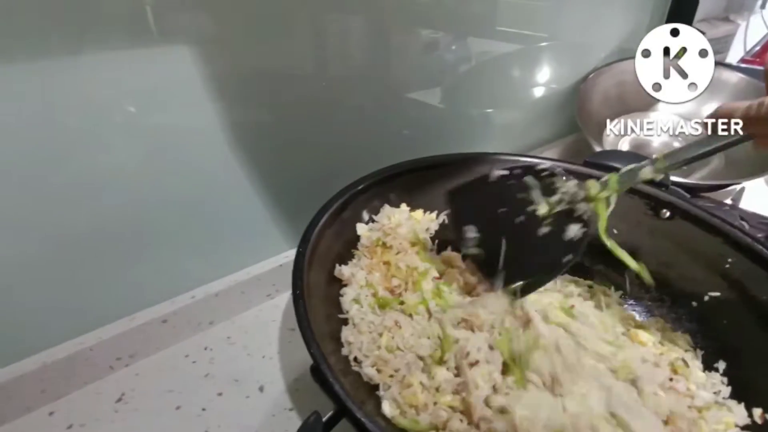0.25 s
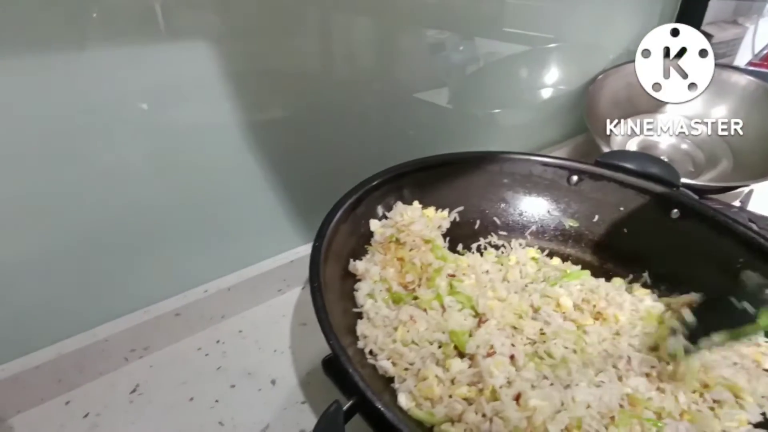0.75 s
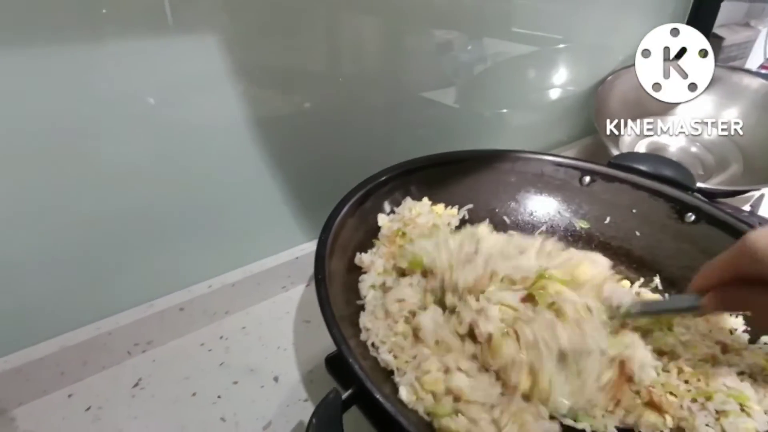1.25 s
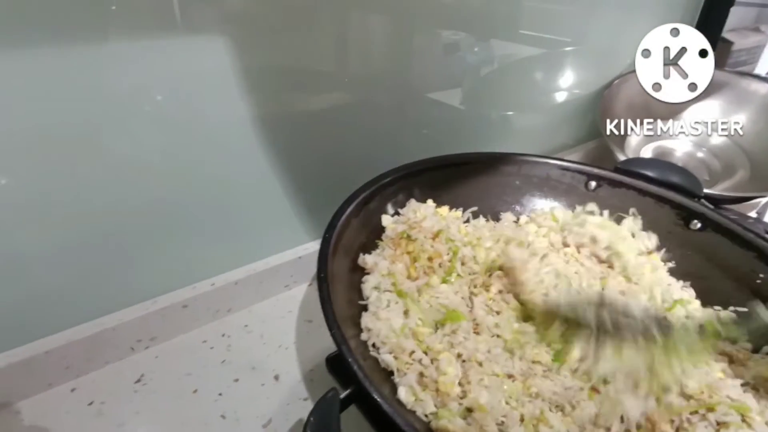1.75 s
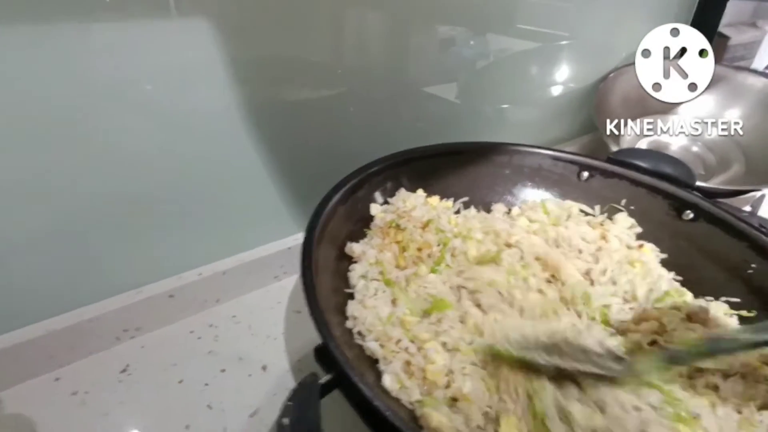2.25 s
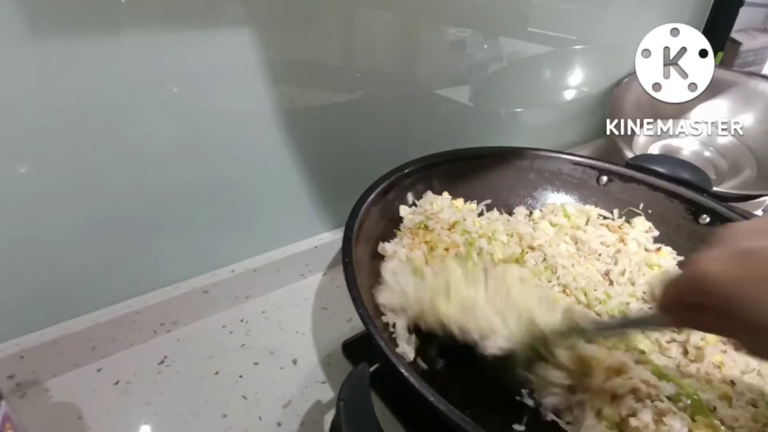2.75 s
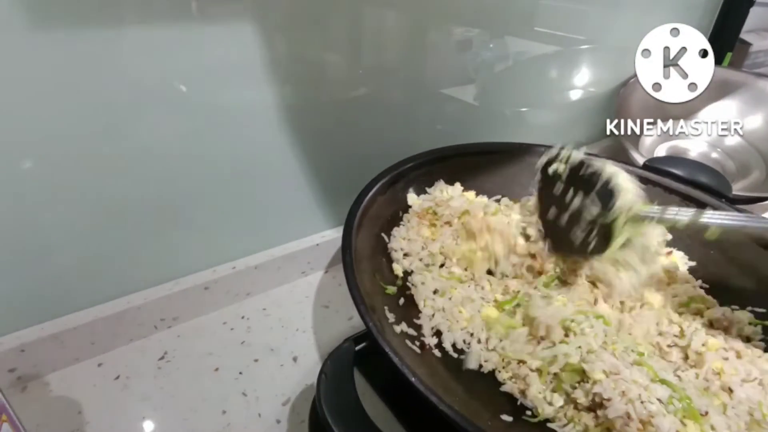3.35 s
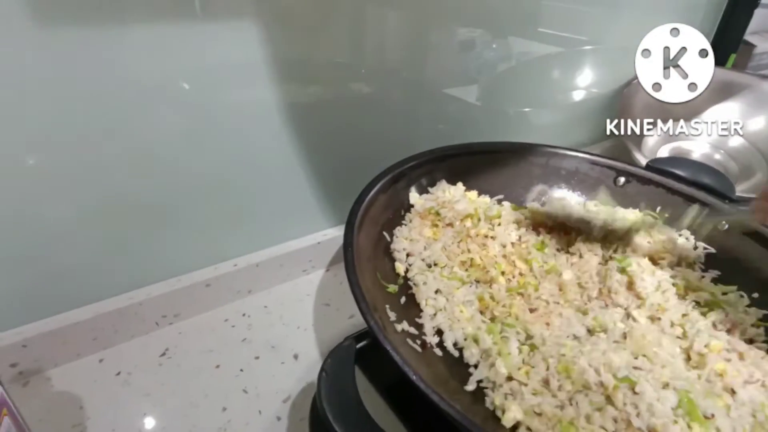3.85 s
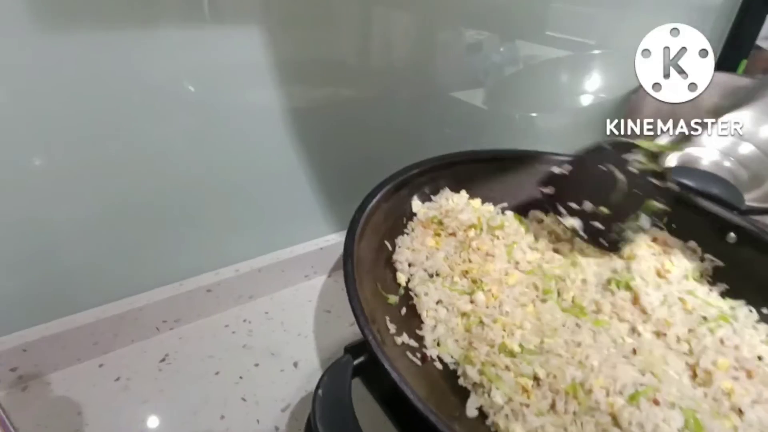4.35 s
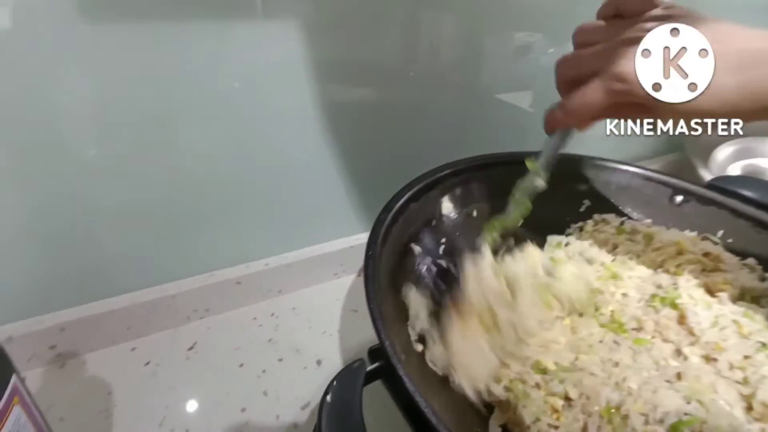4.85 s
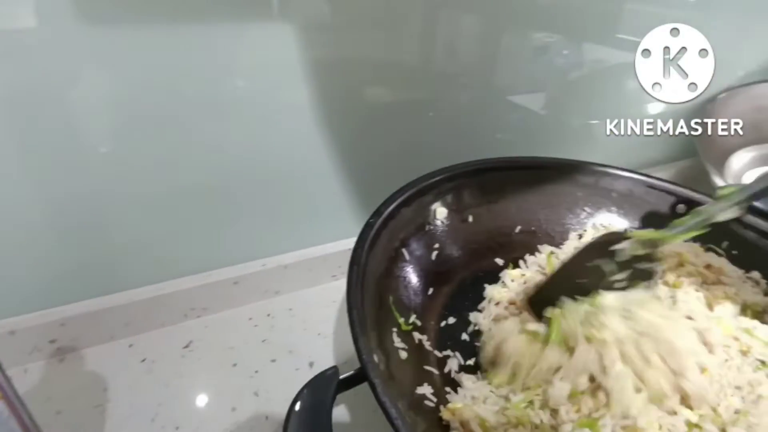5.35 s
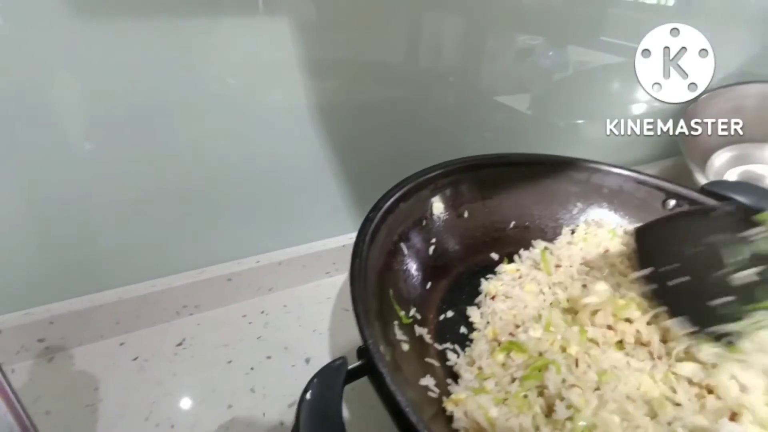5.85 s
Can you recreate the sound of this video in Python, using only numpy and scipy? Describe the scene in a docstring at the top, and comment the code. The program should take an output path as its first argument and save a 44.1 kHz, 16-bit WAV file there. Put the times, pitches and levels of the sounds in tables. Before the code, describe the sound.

In a small hard-walled kitchen, a spatula stirs rice in a wok. Soft swishes of rice lead to a cluster of dull knocks, bumps and a short scrape near one second. A sharp bright clank and rasping scrapes come at two and a half seconds, then quieter rustling, light taps and a final knock. A burner rushes softly beneath. Close, slightly dull mono pickup.

```python
"""Stir-frying rice in a wok

Struck modes: a metal spatula knocks and clanks on the pan, and the wok bumps on its support.
Stick-slip friction: the blade scrapes along the pan, as filtered clicks, and at moments squeaks, as gliding tones.
Granular noise: the rice rustles and sizzles softly. All of this echoes in a small, hard-walled kitchen.
Beneath it go on the shaped noise of a gas burner and the wavering sines of a faint motor hum."""
import sys
import numpy as np
from scipy import signal
from scipy.fft import rfft, irfft, next_fast_len
from scipy.io import wavfile

SR = 44100
rng = np.random.default_rng(int(sys.argv[2]) if len(sys.argv) > 2 else 0)


def unload_audio(sound):
    """Save the sound as a 16-bit wav file, at the path given as the first command line argument."""
    columns = np.transpose(np.atleast_2d(sound))
    # keep every value between -1 and 1, then stretch to whole-number steps
    steps = np.round(np.clip(columns, -1, 1) * 32767)
    wavfile.write(sys.argv[1], SR, steps.astype(np.int16))


N = 268107
TIME = np.arange(N) / SR
RING_TIME = TIME[:SR // 4]


def from_db(db):
    """Logarithmic level: decibels to amplitude gain."""
    return 10 ** (np.asarray(db) / 20)


def rms_one(x):
    """Power normalisation: scale to rms 1."""
    return x / np.sqrt(np.mean(x ** 2) + 1e-20)


def energy_one(x):
    """Energy normalisation: scale the sum of squares to 1."""
    return x / np.sqrt(np.sum(x ** 2) + 1e-20)


def at_hz(points, hz):
    """Logarithmic frequency scale: interpolate a table between its frequencies."""
    known_hz, values = np.transpose(points)
    return np.interp(np.log(np.maximum(hz, 1)), np.log(known_hz), values)


def colour(x, spectrum):
    """Spectral shaping: weight each frequency of a signal by a table; rms 1."""
    size = next_fast_len(len(x))
    gain = from_db(at_hz(spectrum, np.fft.rfftfreq(size, 1 / SR)))
    return rms_one(irfft(rfft(x, size) * gain, size)[:len(x)])


def drift(rate):
    """Slow random modulation: straight lines between `rate` random knots a second; rms 1."""
    knots = np.arange(0, TIME[-1] + 1, 1 / rate)
    return rms_one(np.interp(TIME, knots, rng.standard_normal(len(knots))))


def dying(t, t60):
    """Exponential damping: from 1 down by 60 dB in t60 seconds."""
    return np.exp(-np.log(1000) * t / max(t60, 1e-4))


def through(x, response):
    """Linear superposition: convolve a signal with an impulse response."""
    return signal.fftconvolve(x, response)[:len(x)]


def above(x, hz):
    """Radiation efficiency: a small body radiates little below its corner."""
    return signal.sosfilt(signal.butter(2, hz, "high", fs=SR, output="sos"), x)


def ringing(modes, vary_db):
    """Modal excitation: one striking spot gives each mode its own strength and sign; energy 1."""
    ring = 0
    for hz, db, t60 in modes:
        mode = energy_one(np.sin(2 * np.pi * hz * RING_TIME) * dying(RING_TIME, t60))
        strength = from_db(db + vary_db * rng.standard_normal())
        ring = ring + strength * rng.choice([-1, 1]) * mode
    return energy_one(ring)


def push(hz, width_hz):
    """Cushioned contact: an oscillation that swells and dies, faster for a larger width; energy 1."""
    age = np.pi * width_hz * RING_TIME
    return energy_one(age * np.exp(-np.minimum(age, 200)) * np.sin(2 * np.pi * hz * RING_TIME))


def grains(per_s, spread_db):
    """Shot noise: tiny random impulses of uneven size; rms 1."""
    sizes = from_db(spread_db * np.minimum(rng.exponential(1, N), 4)) * rng.choice([-1, 1], N)
    return rms_one(sizes * (rng.random(N) < per_s / SR))


def add(out, s, db, sound):
    """Level of a transient: mix in a sound of energy 1 at time s, db being its rms over 8 ms."""
    start = int(s * SR)
    gain = from_db(db) * np.sqrt(.008 * SR)
    part = out[start:start + len(sound)]
    part += gain * sound[:len(part)]


# Vibration modes of the bowl, damped by the rice: pitch_hz, mean relative level_db, t60_s
BOWL_MODES = [(221, -5.5, 0.52), (305.5, -4.5, 0.75), (379.4, 3, 0.48), (587.4, 5, 0.076), (667, -6, .1),
              (811, -2.5, 0.11), (890, -4.5, 0.4), (927, -9, 0.093), (988, 5, 0.11), (1037, 0.5, 0.21),
              (1080, -6, 0.094), (1253, -9, 0.097), (1380, -18.5, 0.06), (1743, -4.5, 0.14),
              (1975, -12, 0.13)]


def bowl(hz, width_hz, bowl_db=-5, bowl_low_hz=170):
    """Impact response: one contact and the modal ring that it leaves in the bowl; energy 1."""
    contact = energy_one(above(push(hz, width_hz), bowl_low_hz))
    ring = energy_one(through(contact, ringing(BOWL_MODES, vary_db=4.5)))
    return energy_one(contact + from_db(bowl_db) * ring)


# Bright ring of blade against pan: pitch_hz, mean relative level_db, t60_s
BLADE_RING_MODES = [(1380, 6.5, 0.011), (1632, 0.5, 0.015), (1940, -7.5, 0.066), (2194, -10.5, .035),
                    (2648, -5, 0.022), (2733, 1.5, 0.016), (2960, -14.5, 0.0082), (3320, -22.5, 0.044),
                    (3456, -0.5, 0.014), (3614, -11.5, 0.013), (3710, 2, 0.011), (4000, -16.5, .012),
                    (4880, -4.5, 0.021), (4545, 7.5, 0.014), (4720, -10.5, 0.012), (6090, -0.5, 0.0086),
                    (7040, -0.5, 0.012)]
# Noise spectrum of the edge cracking on metal: frequency_hz, relative level_db per Hz
CRACK_SPECTRUM = [(900, -23.5), (1600, 2.5), (2400, 3), (3500, 2.5), (4900, 7), (5500, -8.5), (6400, -0.5),
                  (7200, -40), (8200, -11.5)]


def clink(ring_db=-4, crack_db=-1, crack_t60=0.017):
    """Hard impact: a noisy crack of the edge and the bright modes of the blade; energy 1."""
    landing = 1 - np.exp(-RING_TIME / .0012)  # rice under the edge cushions the touch
    noise = colour(rng.standard_normal(len(RING_TIME)), CRACK_SPECTRUM)
    crack = energy_one(noise * dying(RING_TIME, crack_t60))
    ring = ringing(BLADE_RING_MODES, vary_db=6.5)
    return energy_one(landing * (from_db(crack_db) * crack + from_db(ring_db) * ring))


# The spatula lands through a layer of rice, a dull "tok": start_s, level_db of the first touch, pitch_hz
RICE_KNOCKS = [(0.852, -32, 695), (0.902, -37.5, 1107), (0.940, -33.5, 663), (1.001, -39.5, 626),
               (2.499, -31, 577), (4.554, -43, 597), (5.596, -49, 567), (6.072, -31.5, 600)]
KNOCK_WIDTH_HZ, REBOUND_S, REBOUND_LOSS_DB = 258, 0.0072, 6


def knocks(clink_db=-18):
    """Soft impact with rebound: a cushioned landing sounds the bowl, hardly the springy blade, twice."""
    out = np.zeros(N)
    for s, db, hz in RICE_KNOCKS:
        for touch in range(2):
            sound = bowl(hz, KNOCK_WIDTH_HZ) + from_db(clink_db) * clink()
            add(out, s + touch * REBOUND_S, db - touch * REBOUND_LOSS_DB, sound)
    return out


# The bare edge strikes bare metal: start_s, blade clink level_db, bowl level_db, both of the first touch
METAL_CLANKS = [(0.742, -70, -86), (0.926, -39.5, -40.5), (0.994, -48.5, -46.5), (1.136, -59, -47),
                (1.541, -61.5, -59.5), (2.485, -43, -48), (2.493, -24, -26), (4.289, -63, -64.5),
                (4.417, -44, -45), (4.436, -49.5, -61), (4.657, -53.5, -73), (4.777, -66.5, -67),
                (5.040, -70, -60.5), (5.212, -63.5, -62), (6.073, -56, -41.5)]
CLANK_HZ, CLANK_WIDTH_HZ, CHATTER_S, CHATTER_LOSS_DB = 1020, 450, 0.0023, 5


def clanks(pitch_spread=0.21):
    """Contact chatter: three quick touches, each weaker and on its own random spot."""
    out = np.zeros(N)
    for s, clink_db, bowl_db in METAL_CLANKS:
        for touch in range(3):
            at, loss_db = s + touch * CHATTER_S, touch * CHATTER_LOSS_DB
            add(out, at, clink_db - loss_db, clink())
            spot = rng.uniform(-1, 1)
            hz = CLANK_HZ * np.exp(pitch_spread * spot)
            add(out, at, bowl_db - loss_db, bowl(hz, CLANK_WIDTH_HZ))
    return out


# The wok bumps on its support: start_s, knock level_db, low thump level_db
SUPPORT_BUMPS = [(0.056, -61.5, -64), (0.622, -62.5, -65), (0.871, -51, -42), (0.906, -34, -40),
                 (0.928, -30.5, -40), (0.958, -32.5, -38), (0.997, -49, -44.5), (1.242, -65, -61),
                 (1.389, -51, -70), (2.497, -38, -42.5), (4.254, -51, -53), (4.438, -48, -54.5),
                 (5.754, -48, -53)]
BUMP_HZ, BUMP_WIDTH_HZ = 444, 1030


def bumps(thump_hz=98, thump_width_hz=42, thump_low_hz=52,
          settle_s=0.00896, settle_db=-5, settle_hz=290, settle_width_hz=260):
    """Collision of heavy bodies: a knock and a low thump, then a softer touch as the wok settles."""
    out = np.zeros(N)
    thump = energy_one(above(push(thump_hz, thump_width_hz), thump_low_hz))
    for s, knock_db, thump_db in SUPPORT_BUMPS:
        add(out, s, knock_db, bowl(BUMP_HZ, BUMP_WIDTH_HZ))
        add(out, s, thump_db, thump)
        settle_at = s + settle_s * rng.uniform(0.794, 1.167)
        add(out, settle_at, knock_db + settle_db, bowl(settle_hz, settle_width_hz, bowl_db=-7.5))
    return out


# The blade slides along the pan: start_s, length_s, bright rasp level_db and dull grind level_db
# (both before the pressure changes), pressure change_db over the stroke
SCRAPE_STROKES = [(0.857, 0.13, -50.5, -42.5, -1), (1.137, 0.044, -73, -45, -6.5),
                  (2.50, 0.11, -41.5, -38, -12), (2.623, 0.063, -43.5, -49, -6.5),
                  (2.736, 0.13, -69.5, -55, -6), (4.415, 0.12, -56.5, -53, -2),
                  (4.546, 0.14, -54, -55.5, 1.5), (6.051, 0.046, -50, -60, 6)]
# Spectrum of the bright rasp: frequency_hz, relative level_db per Hz
RASP_SPECTRUM = [(1200, -9), (1700, -15.5), (2200, -8), (2800, -5.5), (3300, 7.5), (3650, 1.5), (4050, 3.5),
                 (4450, 8.5), (4950, -3.5), (5400, -5.5), (6400, -10.5), (7500, -9.5), (8200, -19)]
# Spectrum of the dull grind: frequency_hz, relative level_db per Hz
GRIND_SPECTRUM = [(70, -21.5), (200, 2.5), (400, -2), (700, 2), (1100, -8), (1500, -8.5), (2000, -20),
                  (3000, -40)]
STROKE_ATTACK_S, STROKE_RELEASE_T60 = 0.006, 0.057
UNLOAD_DB_PER_S = 43.5  # the grind fades as the rice slides off the blade


def scrapes(slips_per_s=1500, judder_db=5.0, blade_db=-8, bowl_db=-5):
    """Stick-slip friction: dense clicks of uneven strength rasp on the blade and grind in the bowl."""
    judder = from_db(judder_db * np.tanh(drift(rate=120)))
    slips = grains(slips_per_s, spread_db=0.0) * judder
    blade_ring = rms_one(through(slips, ringing(BLADE_RING_MODES, vary_db=0.5)))
    bright = rms_one(colour(slips, RASP_SPECTRUM) + from_db(blade_db) * blade_ring)
    bowl_ring = rms_one(through(slips, ringing(BOWL_MODES, vary_db=2.5)))
    dull = rms_one(colour(slips, GRIND_SPECTRUM) + from_db(bowl_db) * bowl_ring)
    out = np.zeros(N)
    for start, length, rasp_db, grind_db, change_db in SCRAPE_STROKES:
        age = np.maximum(TIME - start, 0)
        release = dying(np.maximum(age - length, 0), STROKE_RELEASE_T60)
        contact = np.minimum(age / STROKE_ATTACK_S, 1) * release
        pressure = contact * from_db(change_db * np.minimum(age / length, 1))
        rasp = bright * from_db(rasp_db)
        grind = dull * from_db(grind_db - UNLOAD_DB_PER_S * age)
        out += pressure * (rasp + grind)
    return out


# The edge catches and sings briefly: start_s, end_s, mean start pitch_hz, mean end pitch_hz,
# level_db at the middle
EDGE_SQUEAKS = [(1.130, 1.185, 1910, 1906, -61.5), (2.682, 2.719, 770, 742, -55),
                (2.756, 2.805, 785, 702, -59), (2.823, 2.856, 670, 693, -57.5)]


def squeaks():
    """Periodic stick-slip: slips that fall into step are heard as a rough, gliding tone."""
    out = np.zeros(N)
    waver = 1 + .02 * drift(rate=300)
    flutter = rms_one(1 + .6 * drift(rate=250))
    for start, end, from_hz, to_hz, db in EDGE_SQUEAKS:
        along = np.clip((TIME - start) / (end - start), 0, 1)
        hz = (from_hz + (to_hz - from_hz) * along) * waver
        swell = 2 * np.sqrt(along * (1 - along))
        tone = np.sqrt(2) * np.sin(2 * np.pi * np.cumsum(hz) / SR)
        out += from_db(db) * swell * flutter * tone
    return out


# A spatula-load of rice is turned or falls back: peak_s, level_db added in power at the peak, rise spread_s
RICE_SWISHES = [(0.40, -61.5, 0.033), (1.29, -65.5, 0.068), (1.61, -64, 0.13), (2.10, -58.5, 0.035),
                (3.332, -60, 0.046), (3.83, -63, 0.075), (5.13, -68, 0.052), (5.58, -74, 0.05)]
# Spectrum of the rustle and sizzle: frequency_hz, relative level_db per Hz
RICE_SPECTRUM = [(200, -6.5), (600, -1.5), (1300, 5), (2000, -3), (3000, -4), (4000, -3.5), (4650, 0),
                 (5050, -3), (5450, -9), (6800, -7), (7700, -12.5), (8300, -30)]
SIZZLE_DB = -70
SWISH_FALL_RATIO = 1.14  # the rice settles more slowly than it is lifted


def rice(grains_per_s=2000, fizz_db=-5, clump_db=3.44):
    """Granular noise: moist grains part and fall in clumps, over the fine sizzle of the hot pan."""
    power = from_db(SIZZLE_DB) ** 2
    for s, db, spread_s in RICE_SWISHES:
        width_s = spread_s * np.where(TIME < s, 1, SWISH_FALL_RATIO)
        power = power + from_db(db) ** 2 * np.exp(-((TIME - s) / width_s) ** 2)
    falling = grains(grains_per_s, spread_db=4.5) * from_db(clump_db * drift(rate=79))
    crackle = falling + from_db(fizz_db) * rng.standard_normal(N)
    return np.sqrt(power) * colour(crackle, RICE_SPECTRUM)


# Decay of the kitchen's reverberation: frequency_hz, t60_s
KITCHEN_DECAY = [(100, 0.47), (500, 0.43), (1200, 0.6), (4000, 0.47), (8000, 0.53)]


def reflections(x, near_db=-4, near_t60=0.096, tail_db=-5, build_s=0.015):
    """Room acoustics: quick returns off splashback and worktop, then a diffuse decaying tail."""
    t = TIME[:SR]
    edges = np.geomspace(40, 12000, 9)
    tail = 0
    for low, high in zip(edges, edges[1:]):
        band_filter = signal.butter(2, [low, high], "band", fs=SR, output="sos")
        band = signal.sosfilt(band_filter, rng.standard_normal(len(t)))
        tail = tail + band * dying(t, at_hz(KITCHEN_DECAY, np.sqrt(low * high)))
    # the tail gets the share of white-noise energy below its top edge
    tail = energy_one(tail * (1 - np.exp(-t / build_s))) * np.sqrt(2 * edges[-1] / SR)
    near = energy_one(rng.standard_normal(len(t)) * dying(t, near_t60) * (t > .002))
    return through(x, from_db(near_db) * near + from_db(tail_db) * tail)


# Spectrum of the burner's rush: frequency_hz, relative level_db per Hz
BURNER_SPECTRUM = [(20, -13.5), (40, -15.5), (55, -7.5), (80, -11.5), (110, -8.5), (140, -10), (200, -12.5),
                   (260, -13), (400, -11), (650, -12), (1050, -14), (1500, -25), (2200, -29.5), (4000, -38)]
BURNER_DB = -63.5  # mean level
# Partials of the motor hum: mean pitch_hz, level_db (rms)
MOTOR_HUM = [(53.8, -79.5), (107.4, -70), (193.8, -76)]


def stove():
    """Broadband and tonal noise: the burner's soft rush and the unsteady partials of a fan motor."""
    level = from_db(BURNER_DB + .6 * drift(rate=25))
    rush = level * colour(rng.standard_normal(N), BURNER_SPECTRUM)
    hum = 0
    for hz, db in MOTOR_HUM:
        swell = 1 + .45 * drift(rate=9)
        wander = .55 * drift(rate=8)  # phase, radians
        hum = hum + from_db(db) * rms_one(swell * np.sin(2 * np.pi * hz * TIME + wander))
    return rush + hum


def scene():
    """Superposition: everything in the wok sounds through the kitchen, over the stove."""
    wok = knocks() + clanks() + bumps() + scrapes() + squeaks() + rice()
    # the point of contact travels round the pan, so its echo paths keep changing
    travel = 2 * np.pi * 4 * TIME
    room = reflections(wok * np.cos(travel)) + reflections(wok * np.sin(travel))
    return (wok + room + stove())[None, :]


CUTOFF_HZ = 7900


def record(dry):
    """Band limitation: a steep low-pass filter cuts the top of the spectrum."""
    return signal.sosfilt(signal.cheby1(12, .2, CUTOFF_HZ, fs=SR, output="sos"), dry)


dry = scene()
out = record(dry)
unload_audio(out)
```